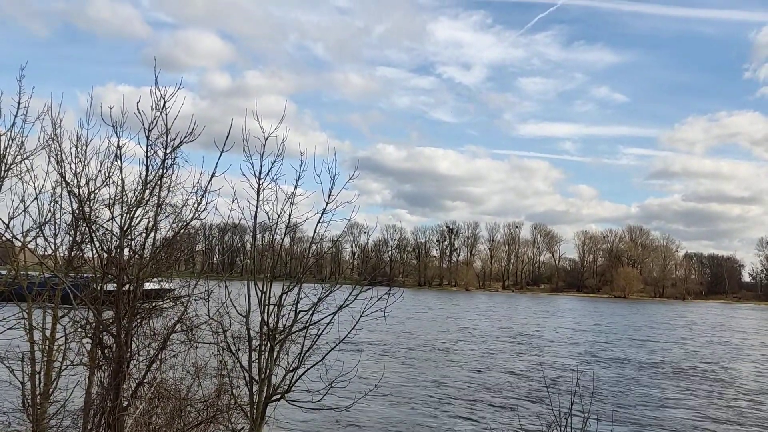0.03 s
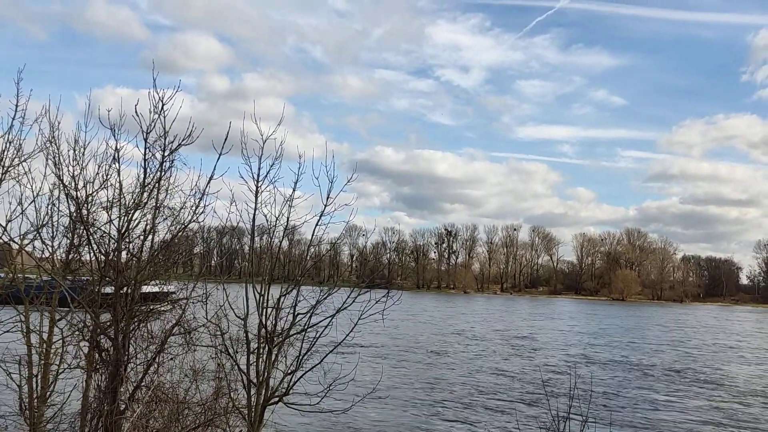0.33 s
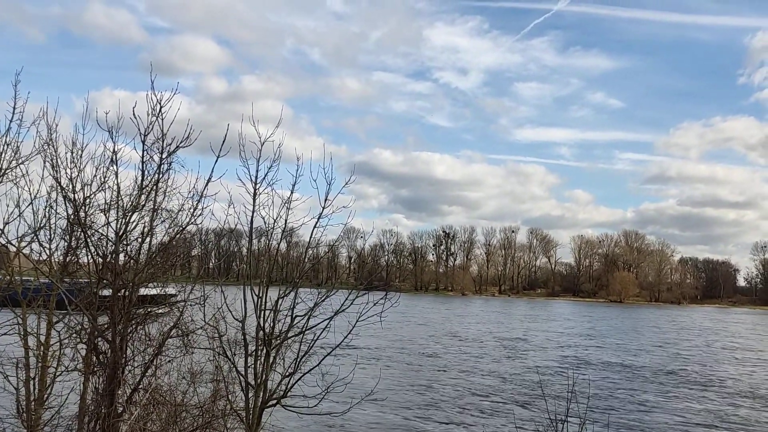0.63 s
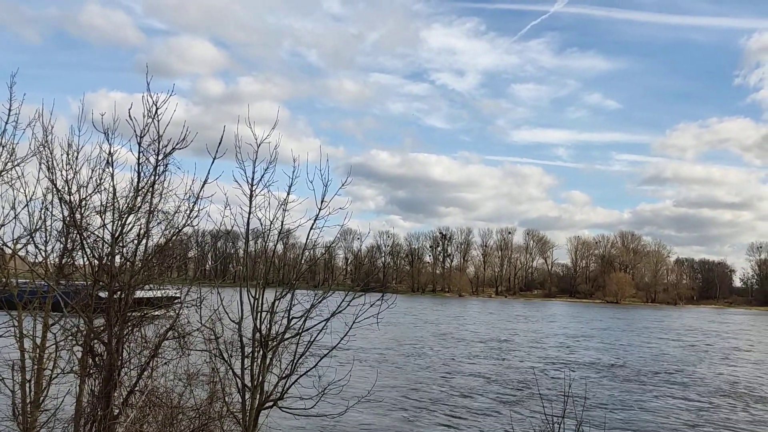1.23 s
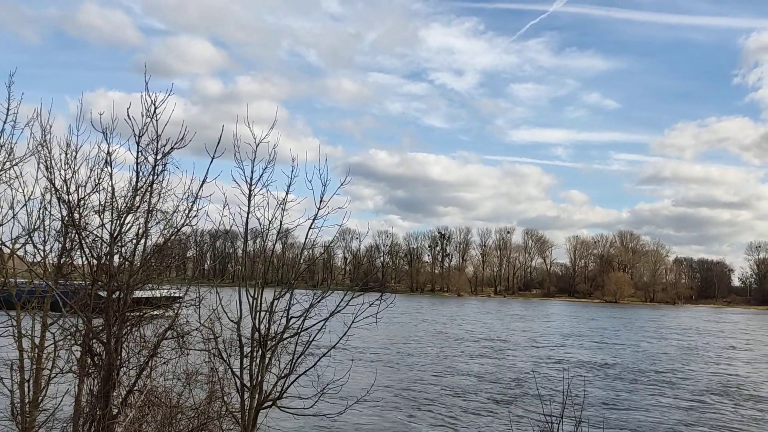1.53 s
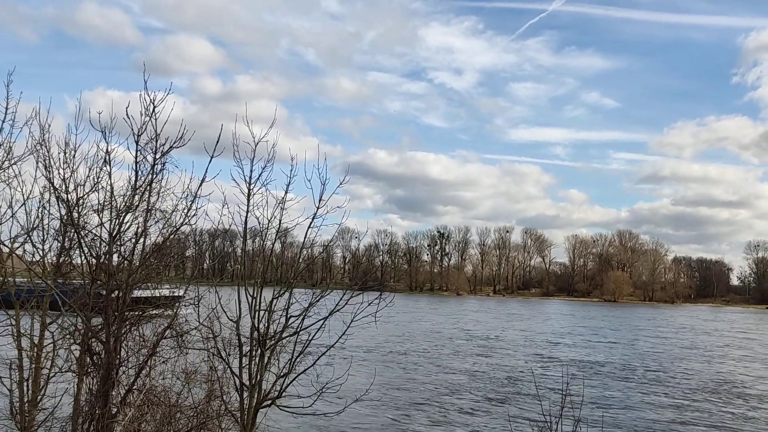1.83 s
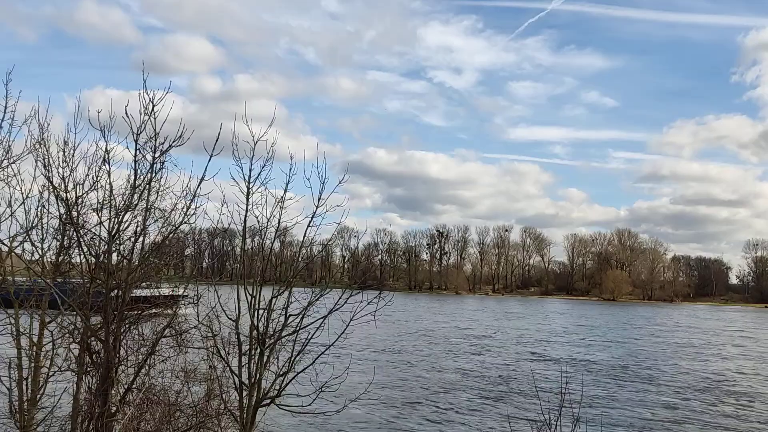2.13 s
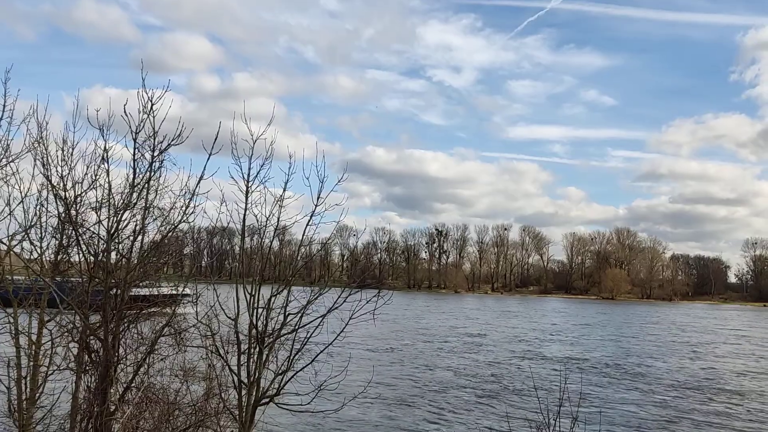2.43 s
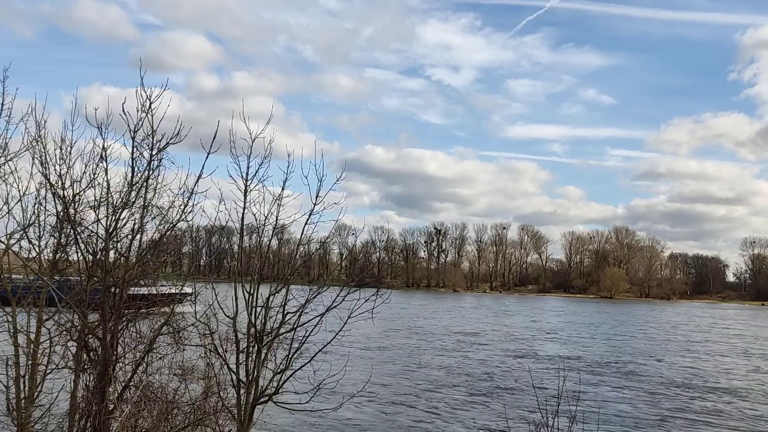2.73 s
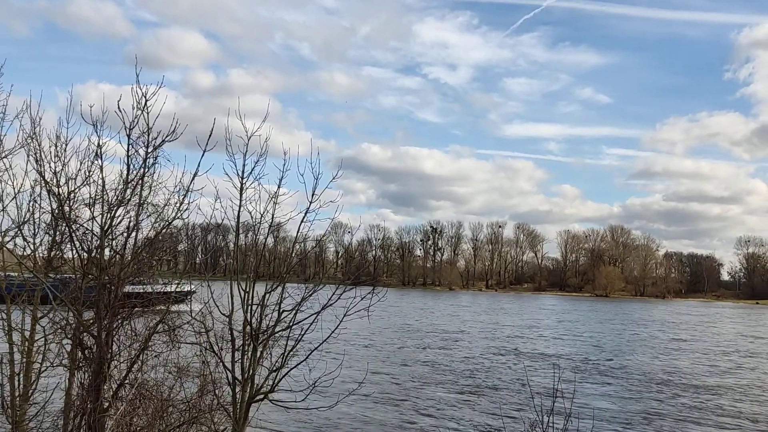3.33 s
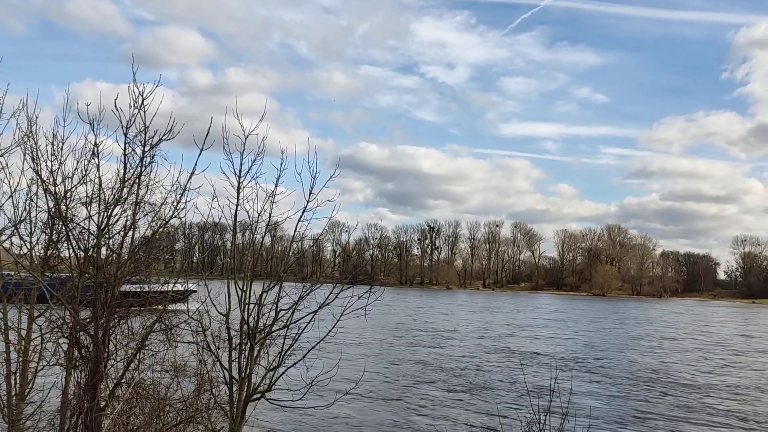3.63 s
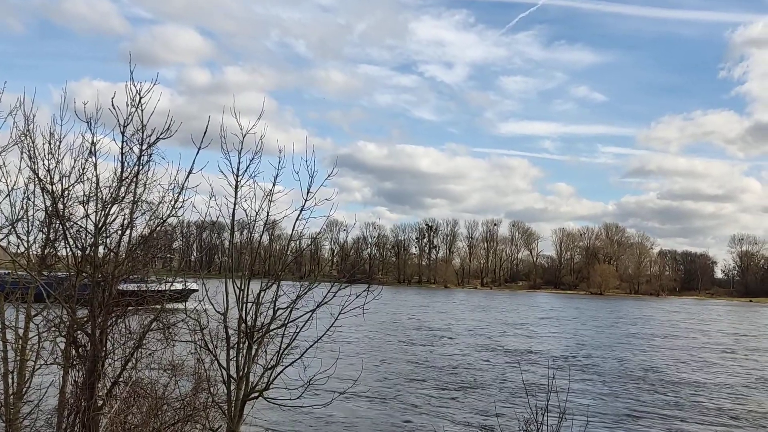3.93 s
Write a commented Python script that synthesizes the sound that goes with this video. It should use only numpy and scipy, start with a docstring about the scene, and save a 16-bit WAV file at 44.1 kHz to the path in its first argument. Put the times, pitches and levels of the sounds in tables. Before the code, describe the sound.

Two short sharp clicks snap close on the right, nearly two seconds apart, on the bank of a wide river. Behind them water washes faintly, a distant barge hums, and light wind bumps the stereo microphone toward the end.

```python
"""On the bank of a wide river, stereo microphone in a light wind. From the start the water washes and
hisses, and a barge engine drones far off. At 0.42 s, close on the right, a small hard catch snaps a third
of a second after a faint tick; it rings for about a millisecond and scatters off ground and bushes.
A distant rumble swells at 1.5 s and 2 s, and the catch ticks and snaps again (1.8 s, 2.17 s).
Then the engine's lowest hum fades, and in the last second the wind bumps the microphone more often."""
import sys
import numpy as np
from scipy import signal
from scipy.fft import rfft, irfft
from scipy.io import wavfile

SR = 44100
rng = np.random.default_rng(int(sys.argv[2]) if len(sys.argv) > 2 else 0)


def transcribe(u):
    """Save the signal u as a 16-bit wav file named by the first command-line argument.

    u: samples, shape (n,) or (channels, n), limited to [-1, 1]; the rate is SR.
    q: integer samples, one column per channel.
    """
    v = np.clip(np.atleast_2d(u).T, -1, 1)
    q = np.round(v * 32767).astype(np.int16)
    wavfile.write(sys.argv[1], SR, q)


N = 176400

# the catch snapping: start_s, level_db, position (0 or 1)
SNAPS = [(0.4201, 2.5, 0), (2.1681, 2, 1)]
# faint ticks as it takes up the load: start_s, level_db
LOAD_TICKS = [(0.058, -32), (1.7956, -32)]
# its resonances: pitch_hz, left_db, right_db, width_hz, shift_db (added in position 1)
CATCH_RESONANCES = [(1900, -9, 4.5, 275, -0.5), (2730, -7.5, 1.5, 330, -1), (4280, -14, -4.5, 490, -1.5),
                    (5220, -13, 1, 350, -3), (7180, 3, 19, 357, -0.5), (8500, -5.5, 19, 390, -0.5),
                    (9100, -7, 12, 240, 8), (10100, 7, 9, 800, -5), (10860, 11, 0, 460, -4),
                    (11800, 2.5, 4, 450, 2), (14000, -14, -9, 430, 9)]
# reflections from the bank nearby: delay_s, level_db, spread_s
BANK_ECHOES = [(.0078, -16, .003), (0.0183, -23, 0.0012), (.041, -23.5, .0036)]
# tone of the scatter off ground and bushes: frequency_hz, left_db, right_db
SCATTER_TONE = [(1500, -17, -20), (4250, -26, -22.5), (5000, -19, -14.5), (5700, -18, -14), (6500, -22, -9),
                (7750, -18, -8), (8100, -15, 1), (8700, -13, 1.5), (9200, -15, -3), (9800, -14, -7),
                (10800, -6.5, -10), (12500, -13, -13), (13500, -11, -11), (14200, -20, -16),
                (15000, -45, -45)]
# how the longer path changes the late scatter: frequency_hz, gain_db
LATE_SCATTER_TONE = [(5000, -1), (7200, -5), (8500, 2.5), (9600, -2), (10800, -3), (12500, -5)]

# wash of the river and its distant traffic: frequency_hz, density_db
WASH_SPECTRUM = [(65, -16), (110, -2), (130, -6.5), (189, -3.5), (258, -10.5), (289, -11), (313, -11.5),
                 (365, -17), (612, -11.5), (661, -12.5), (781, -11.5), (973, -11.5), (1260, -15),
                 (1470, -25.5), (1880, -18.5), (2400, -27), (3120, -30.5), (5280, -120)]
# its slow drift: time_s, level_db
WASH_DRIFT = [(0.0, -47), (0.22, -48.5), (1.37, -47.5), (3.99, -46.5), (4.0, -47)]
# fine hiss of the ripples: frequency_hz, density_db
RIPPLE_SPECTRUM = [(1500, -30), (2200, -7), (2700, 5.5), (3200, -0.5), (3750, 2), (4300, -2), (5100, -3),
                   (5800, -4), (6400, -5), (7600, -6.5), (8500, -4), (9400, -7), (10600, -9.5),
                   (12000, -15), (14200, -17.5), (14800, -44)]
# its slow drift: time_s, level_db
RIPPLE_DRIFT = [(0, -59), (1.1, -57.5), (2.0, -58), (2.6, -57.5), (3.1, -55.5), (4, -56.5)]
# how alike far sound is on the two channels: frequency_hz, coherence (0 to 1)
FAR_COHERENCE = [(100, 1), (250, 1), (750, 0.78), (1500, 0.5), (2400, 0.78), (3500, 0.48), (6000, 0.43),
                 (8000, 0.15), (12000, .08)]
# the side it leans to: frequency_hz, left_minus_right_db
FAR_BALANCE = [(100, 0), (200, -0.5), (1200, 1), (3300, 1.5), (3900, 0.5), (4550, -2), (5200, 2.5),
               (5800, -1), (6400, -3), (7700, -5.5), (8550, -8.5), (9400, -3), (10700, 11), (12500, -1),
               (14000, 2)]
# its bounce off a surface close to the microphone: frequency_hz, left_db, right_db
NEAR_BOUNCE = [(1000, -35, -45), (1670, -20.5, -29), (3140, -10.5, -16), (4600, -7, -14), (6000, -36, -7),
               (8000, -40, -40)]

# the barge engine's lowest hum: time_s, level_db
ENGINE_HUM_LEVEL = [(0, -54), (0.7, -51), (2.3, -49.5), (2.8, -59.5), (4, -62)]
# its higher tones: pitch_hz, level_db, width_hz
ENGINE_TONES = [(186.3, -55.5, 14.3), (199, -59, 18), (231.6, -61.5, 11.5), (302.5, -67, 24)]
# swells of distant rumble: peak_s, width_s, level_db
RUMBLE_SWELLS = [(1.532, 0.11, -45), (2.028, 0.057, -51.5)]
# tone of that rumble: frequency_hz, density_db
RUMBLE_SPECTRUM = [(70, -27), (125, -1), (165, 0.5), (225, -10), (295, -3.5), (400, -25), (900, -60),
                   (5000, -120)]
# breeze on the microphone: time_s, left_db, right_db
BREEZE_LEVEL = [(0, -38.5, -43.5), (1.9, -43, -44.5), (2.4, -36, -40), (2.8, -40.5, -45.5),
                (3.25, -37, -42.5), (3.55, -28.5, -41), (4, -49.5, -34)]
# single buffets: peak_s, width_s, left_db, right_db
WIND_BUFFETS = [(0.752, 0.022, -26, -46), (2.452, 0.025, -30, -49), (2.567, 0.024, -35, -37),
                (3.457, 0.016, -28.5, -42), (3.55, 0.018, -28, -42), (3.726, 0.012, -31, -35),
                (3.908, 0.025, -34, -28.5)]
# turbulence at the microphone: frequency_hz, density_db
WIND_SPECTRUM = [(12, -5.5), (25, 1), (45, -1.5), (75, -2.5), (120, -15), (200, -31.5), (400, -38),
                 (1000, -62), (5000, -115)]


def catch(scatter_gain_db=3):
    """Close on the right: hard contacts (snaps) and light ones (ticks) ring the catch; the bank answers."""
    ticks = sum(impulse(start_s, db) for start_s, db in LOAD_TICKS)
    snaps = sum(catch_ring(impulse(start_s, db), position) for start_s, db, position in SNAPS)
    contacts = ticks + sum(impulse(start_s, db) for start_s, db, _ in SNAPS)
    return snaps + catch_ring(ticks, position=0) + from_db(scatter_gain_db) * bank_scatter(contacts)


def catch_ring(contacts, position, low_cut_hz=1820, left_lag_ms=0.228):
    """The catch's resonances add in alternating sign; so small a part radiates no bass."""
    ringing = 0
    for k, (pitch_hz, left_db, right_db, width_hz, shift_db) in enumerate(CATCH_RESONANCES):
        gains = from_db(np.array([[left_db], [right_db]]) + position * shift_db)
        ringing = ringing + (-1) ** k * gains * resonance(contacts, pitch_hz, width_hz)
    left, right = signal.sosfilt(signal.butter(5, low_cut_hz, "high", fs=SR, output="sos"), ringing)
    return np.array([irfft(rfft(left) * delay(left_lag_ms), N), right])


def bank_scatter(contacts, tail_db=-19, t60_s=0.22, onset_s=0.0027, dulling_s=0.028):
    """Ground and twigs return smeared echoes and a short diffuse tail; the late part comes back duller."""
    t = np.arange(N) / SR
    tail_power = from_db(-120 * np.minimum(t / t60_s, 2)) * (t > onset_s)
    power = from_db(tail_db) ** 2 * tail_power / tail_power.sum()
    for delay_s, db, spread_s in BANK_ECHOES:
        echo = np.exp(-0.5 * ((t - delay_s) / spread_s) ** 2)
        power += from_db(db) ** 2 * echo / echo.sum()
    early = unit_rms(irfft(white_spectra() * from_db(over_frequency(SCATTER_TONE)), N))
    dulled = irfft(rfft(early) * from_db(over_frequency(LATE_SCATTER_TONE)), N)
    early_share = np.exp(-(t / dulling_s) ** 2)
    response = (early_share * early + (1 - early_share) * dulled) * np.sqrt(power)
    return signal.fftconvolve(response, contacts[None], axes=1)[:, :N]


def river(wash_gain_db=4):
    """Out on the water: a broad wash, with the fine hiss of ripples above it."""
    wash = from_db(over_time(WASH_DRIFT) + wash_gain_db) * far_noise(WASH_SPECTRUM)
    ripples = from_db(over_time(RIPPLE_DRIFT)) * far_noise(RIPPLE_SPECTRUM)
    return wash + ripples


def barge(hum_hz=100.4, wander_hz=1.516, wander_rate_hz=4):
    """Far off, centred: a wavering engine hum and higher tones, blurred by the long way over the water."""
    pitch_hz = hum_hz + wander_hz * narrow_noise(0, wander_rate_hz)
    hum = from_db(over_time(ENGINE_HUM_LEVEL)) * unit_rms(np.sin(2 * np.pi * np.cumsum(pitch_hz) / SR))
    return hum + sum(from_db(db) * narrow_noise(hz, width_hz / 2) for hz, db, width_hz in ENGINE_TONES)


def wind():
    """Right on the microphone: low turbulence, separate on each channel, with brief buffets."""
    t = np.arange(N) / SR
    power = from_db(over_time(BREEZE_LEVEL)) ** 2
    for peak_s, width_s, left_db, right_db in WIND_BUFFETS:
        power += from_db([[left_db], [right_db]]) ** 2 * np.exp(-((t - peak_s) / width_s) ** 2)
    turbulence = unit_rms(irfft(white_spectra() * from_db(over_frequency(WIND_SPECTRUM)), N))
    return np.sqrt(power) * turbulence


def rumble():
    """In the distance a low rumble swells briefly, twice."""
    t = np.arange(N) / SR
    swells = sum(from_db(db) * np.exp(-0.5 * ((t - peak_s) / width_s) ** 2)
                 for peak_s, width_s, db in RUMBLE_SWELLS)
    return swells * far_noise(RUMBLE_SPECTRUM)


def far_noise(spectrum, right_lag_ms=0.16, left_bounce_ms=1.187, right_bounce_ms=1.028):
    """Noise from across the water arrives on the left first, then again off a near surface; unit rms."""
    mid, side = white_spectra()
    coherence = over_frequency(FAR_COHERENCE)
    sign = np.array([[1], [-1]])  # left, right
    stereo = np.sqrt(1 + coherence) * mid + np.sqrt(1 - coherence) * side * sign
    tone = from_db(over_frequency(spectrum) + sign * over_frequency(FAR_BALANCE) / 2)
    bounce = from_db(over_frequency(NEAR_BOUNCE)) * [delay(left_bounce_ms), delay(right_bounce_ms)]
    arrival = np.array([delay(0), delay(right_lag_ms)])
    return unit_rms(irfft(stereo * tone * (1 + bounce) * arrival, N))


def impulse(start_s, db):
    """One hard contact, a single sample long."""
    x = np.zeros(N)
    x[int(start_s * SR)] = from_db(db)
    return x


def resonance(x, pitch_hz, width_hz):
    """A ring that starts at once and dies within milliseconds."""
    radius = np.exp(-np.pi * width_hz / SR)
    feedforward = (1 - radius ** 2) / 2 * np.array([1, 0, -1])
    feedback = [1, -2 * radius * np.cos(2 * np.pi * pitch_hz / SR), radius ** 2]
    return signal.lfilter(feedforward, feedback, x + 1e-18)


def narrow_noise(centre_hz, half_width_hz):
    """A narrow band of mono noise at unit rms."""
    return unit_rms(irfft(white_spectra()[0] / (1 + ((bin_hz() - centre_hz) / half_width_hz) ** 2), N))


def white_spectra():
    """Spectra of two unrelated white noises."""
    return rfft(rng.standard_normal((2, N)))


def delay(ms):
    """Spectrum of a pure delay."""
    return np.exp(-2j * np.pi * bin_hz() * ms / 1000)


def over_time(rows):
    """A table's columns, interpolated sample by sample."""
    time_s, *columns = np.transpose(rows)
    return np.array([np.interp(np.arange(N) / SR, time_s, column) for column in columns])


def over_frequency(rows):
    """A table's columns, interpolated bin by bin on a log frequency axis."""
    hz, *columns = np.transpose(rows)
    return np.array([np.interp(np.log(bin_hz() + 1), np.log(hz + 1), column) for column in columns])


def bin_hz():
    """Frequencies of the spectrum bins."""
    return np.arange(N // 2 + 1) * SR / N


def from_db(db):
    """Decibels to gain."""
    return 10 ** (np.asarray(db) / 20)


def unit_rms(x):
    """Scale to unit power."""
    return x / np.sqrt(np.mean(x ** 2) + 1e-20)


def scene():
    """The catch up close, river, barge and rumble beyond it, wind on the microphone."""
    return catch() + river() + barge() + rumble() + wind()


def record(dry):
    """The recorder cuts the top treble steeply."""
    cutoff_hz = 15500
    return irfft(rfft(dry) / np.sqrt(1 + (bin_hz() / cutoff_hz) ** 80), N)


dry = scene()
out = record(dry)
transcribe(out)
```